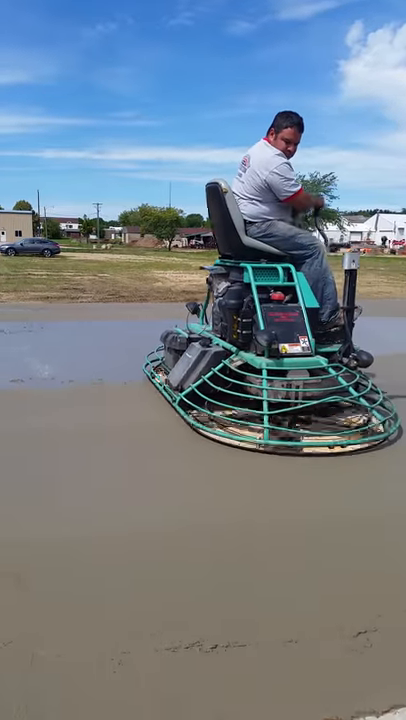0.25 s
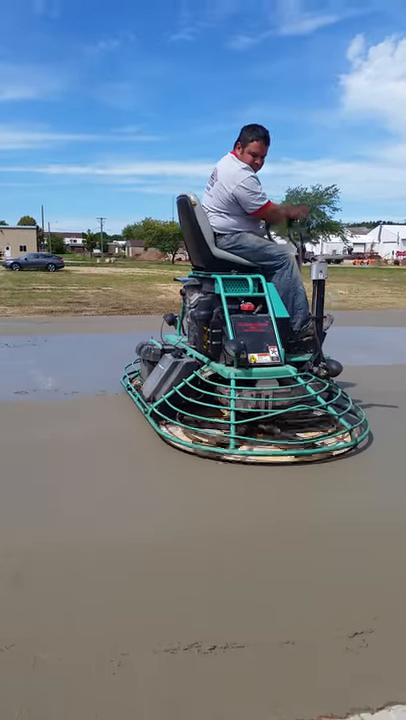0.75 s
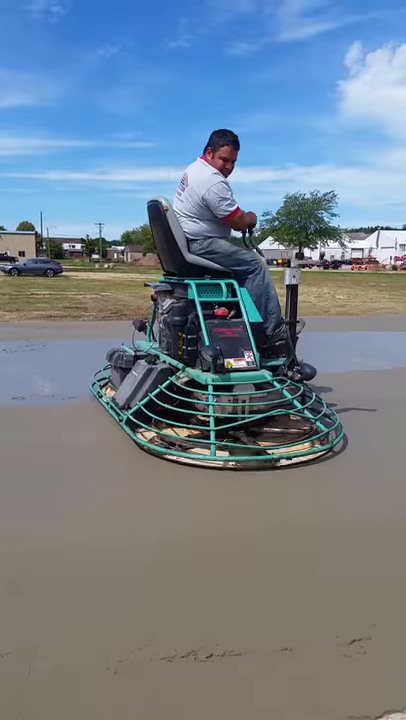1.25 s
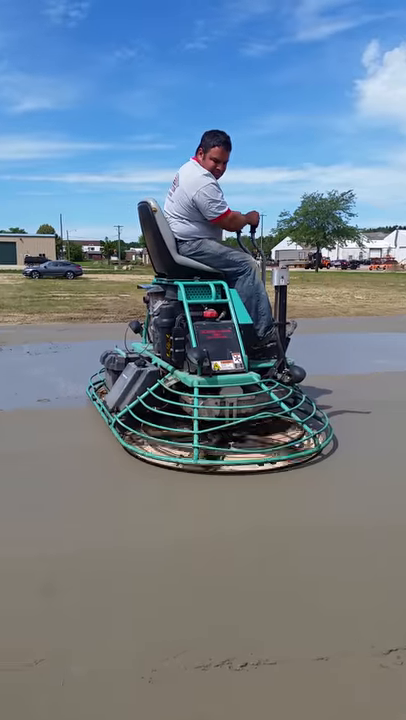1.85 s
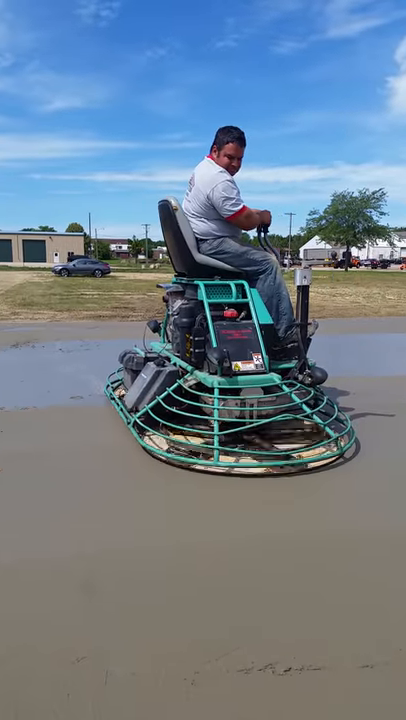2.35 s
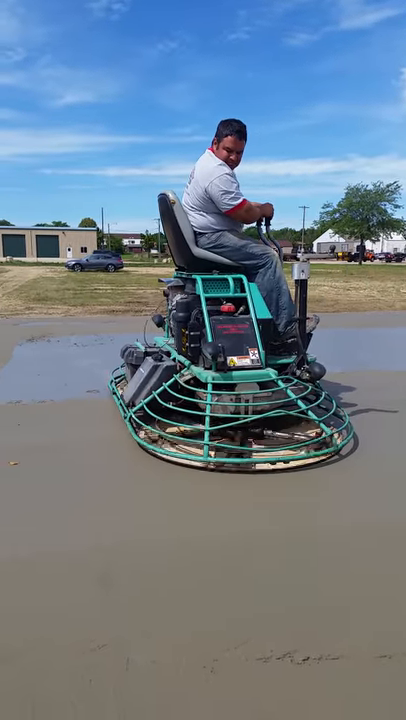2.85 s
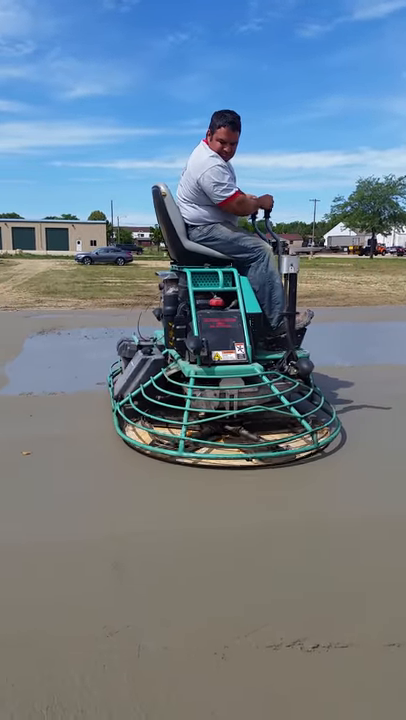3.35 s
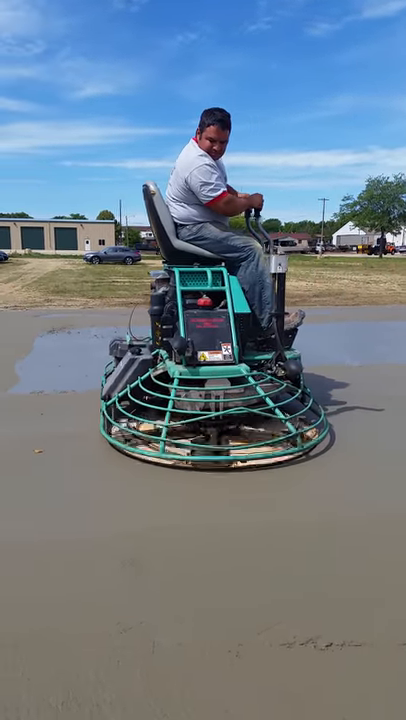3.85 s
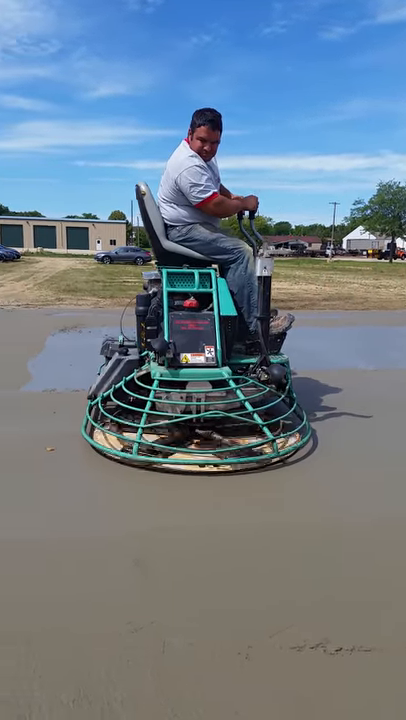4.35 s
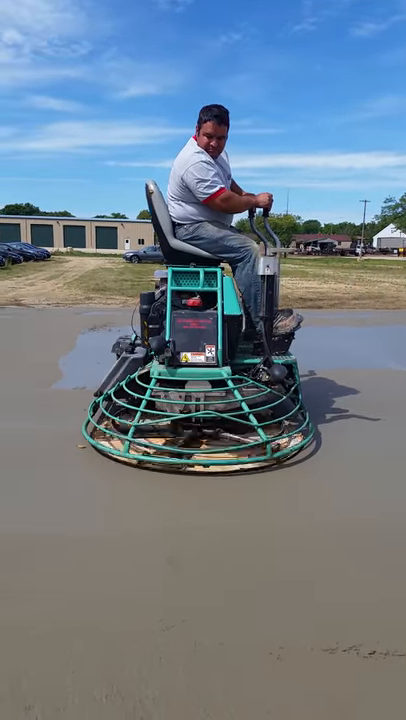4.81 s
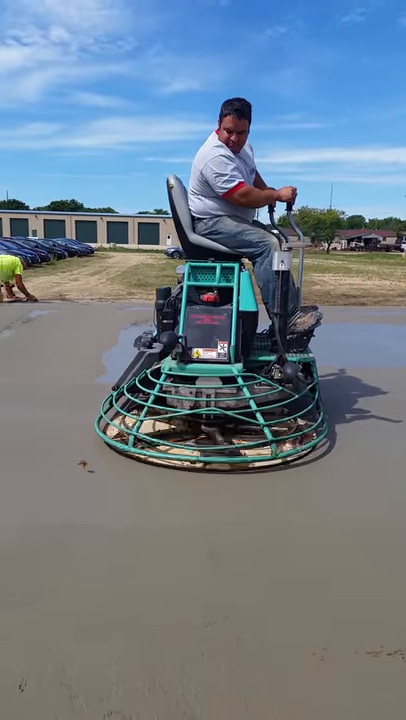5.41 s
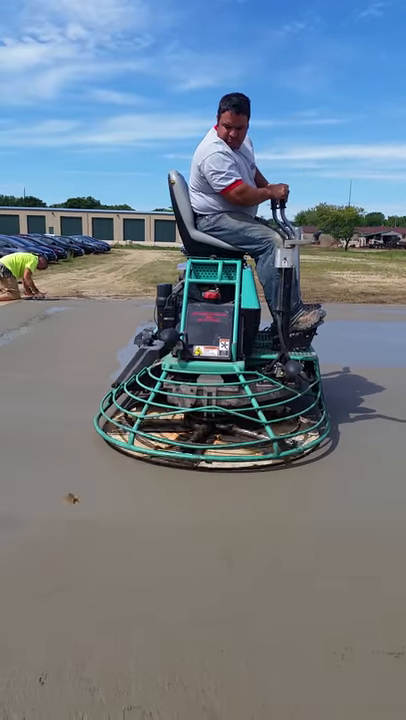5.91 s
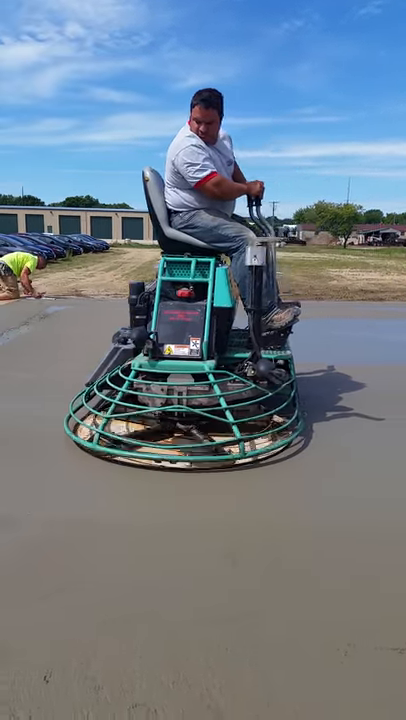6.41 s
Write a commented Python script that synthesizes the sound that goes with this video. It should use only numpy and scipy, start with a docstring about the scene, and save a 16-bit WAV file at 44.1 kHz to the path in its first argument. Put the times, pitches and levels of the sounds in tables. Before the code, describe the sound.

Out in the open, the engine of a ride-on concrete trowel drones and rattles from start to finish, heard in stereo from a few metres away. A bright, gritty hiss of steel pans rubbing wet concrete sits above it, leaning right, with a soft wind-like rumble beneath. The pitch sags only slightly under load. One small stone clicks faintly early on and two more later, as the drone and hiss swell a little.

```python
"""A ride-on power trowel smooths wet concrete in the open, a few metres away.
Its two-cylinder engine fires unevenly: the exhaust drones, the casing clatters, the fan hums faintly
and a low rush puffs with each firing over a wind-like rumble. The steel pans hiss on the gritty paste,
small stones click and faint tones ring. Left and right microphones hear different colour and delay."""
import sys
import numpy as np
from scipy import signal
from scipy.fft import rfft, irfft, next_fast_len
from scipy.io import wavfile

SR = 44100
rng = np.random.default_rng(int(sys.argv[2]) if len(sys.argv) > 2 else 0)


def persist_wave(psi):
    """Save psi, clipped to +-1, as 16-bit WAV."""
    counts = np.round(np.clip(psi, -1, 1) * 32767).astype(np.int16)
    wavfile.write(sys.argv[1], SR, np.atleast_2d(counts).T)


N = 294147

# Tone colours of the low rush with its rumble, the casing clatter and the pans' hiss:
# (frequency [Hz], relative left level [dB], relative right level [dB], likeness [0-1], right lead [rad])
RUSH_COLOUR = [(25, -67, -59, 0.27, -0.3), (60, -65, -58.5, 0, 0.0), (120, -54, -58.5, 0.66, -0.13),
               (202, -58, -56, 1, -1.3), (302, -57.5, -55.5, 0.85, 0.75), (400, -60.5, -56, 0.83, 0.2),
               (527, -64.5, -60.5, 0.42, 1.15), (683, -63, -60, 0.47, 2.5)]
CLATTER_COLOUR = [(736, -57.5, -60, 1, 0.74), (885, -57, -58, 1, 0.98), (1070, -60, -55.5, 0.99, 1.44),
                  (1220, -65, -56.5, 0.3, 0.91), (1450, -60.5, -57.5, 1, 1.2), (1680, -61, -55, 0.46, 0.8),
                  (1950, -68, -53, 0.48, 0.69), (2070, -64, -55, 0.48, -0.19),
                  (2400, -66.5, -55, 0.46, 0.87), (2510, -62, -58, 0.64, 0.78),
                  (2800, -65, -52.5, 0.18, 0.35), (3000, -64.5, -55, 0.34, 1.2),
                  (3320, -69.5, -55, 0.72, -1.5)]
HISS_COLOUR = [(3520, -64.5, -61.5, 0.58, 0), (4130, -66, -60.5, 0.99, 0.6),
               (4430, -64.5, -56.5, 0.38, 1.5), (5400, -68.5, -58, 0.36, 1), (5580, -65, -67, 0.14, -2),
               (6680, -65, -53.5, 0.37, 3), (6840, -64.5, -53, 0.79, 2.5), (7720, -55.5, -50, 0.3, 3),
               (8440, -63, -56, 0.27, 2), (9640, -62.5, -59.5, .35, 2.5), (11200, -68.5, -64.5, .15, 4),
               (11900, -63.5, -65, .05, 0), (13550, -72.5, -61, .07, -2), (14800, -68, -68.5, .05, -2)]


def exhaust(cycle, speed):
    """Two gas pulses per engine cycle make a drone of wavering harmonics (multiples of the cycle rate)."""
    # Harmonics 5 and 8 lead the drone; 1, 4 and 7 are weak: (harmonic [number], relative level [dB])
    harmonics = [(1, -34), (2, -11), (3, -15), (4, -24), (5, 0), (6, -11), (7, -21), (8, -7), (9, -13),
                 (10, -18), (11, -19), (12, -22), (13, -20), (14, -28), (15, -23), (16, -27), (17, -27),
                 (18, -29), (19, -31), (20, -28), (21, -33), (22, -35), (23, -33), (24, -32), (25, -33),
                 (26, -33)]
    # The drone as the outlet swings round: (time [s], boom of harmonics 4-7 [dB], harmonics 8-11 [dB])
    drone_levels = [(0, -22.5, -27), (.3, -22, -28), (.55, -19.1, -27), (1.1, -20.5, -27.4),
                    (1.4, -20, -25.5), (1.65, -21, -27.5), (2.1, -19.5, -24.5), (2.8, -20, -24.9),
                    (3.7, -19.5, -25), (5.0, -20.5, -25), (5.6, -19, -27), (6.2, -18, -25.5),
                    (6.67, -18, -26)]
    boom_db, upper_db = in_time(drone_levels)
    deep_db = swell(speed, -29.5, db_per_sag=1.5, db_per_s=.5)  # harmonics 1-3
    top_db = swell(speed, -36.5, db_per_sag=3, db_per_s=.7)  # 12 and up
    groups = np.zeros((4, 2, N))
    for harmonic, level_db in harmonics:
        unsteady = .0049 * harmonic  # high harmonics feel uneven burning more
        # the second pulse is weaker, and later because its pipe is longer
        second_pulse = np.angle(1 + .6 * np.exp(-2j * np.pi * harmonic * .4375))
        smear = .008 * harmonic ** 2  # the pipe spreads the pulse in time
        wander = unsteady * drift(4)
        wander += .004 * harmonic ** 2 * drift(.6)  # sound paths shift as the machine moves
        phase = 2 * np.pi * harmonic * (cycle - .06) + 2.97 + second_pulse + smear + wander
        tilt_db = -np.clip(.5 * (harmonic - 3.5), .5, 3.5)  # the left side gets less of the high tones
        lag = .014 * harmonic
        gain = from_db(level_db + 8.5 * unsteady * drift(5.4)) * from_db([[tilt_db / 2], [-tilt_db / 2]])
        groups[min(int(harmonic) // 4, 3)] += gain * np.cos(phase + [[-lag / 2], [lag / 2]])
    levels_db = deep_db, boom_db, upper_db, top_db
    return sum(from_db(db) * unit_level(group) for db, group in zip(levels_db, groups))


def low_rush(cycle, speed):
    """A low rushing noise that puffs with each firing, over a wind-like rumble."""
    puffs = rng.standard_normal((2, N)) * from_db(2 * firing_pulse(cycle, delay=.97, sharpness=12))
    rush = coloured(puffs, RUSH_COLOUR, 19, CLATTER_COLOUR[0][0], flicker_db=1, flicker_hz=11)
    return from_db(swell(speed, -32, db_per_sag=2.3, db_per_s=.28)) * rush


def casing_clatter(cycle, speed, scrub_swing_db):
    """The engine casing rattles with tiny knocks, harder at each firing and when the pans hiss louder."""
    knocks = impacts(per_s=14000, spread_db=1.2)
    knocks *= from_db(1.8 * firing_pulse(cycle, delay=.014, sharpness=15))
    clatter = coloured(knocks, CLATTER_COLOUR, RUSH_COLOUR[-1][0], HISS_COLOUR[0][0],
                       flicker_db=.47, flicker_hz=4.7)
    level_db = swell(speed, -26, db_per_sag=.83, db_per_s=-.066) + .53 * scrub_swing_db
    return from_db(level_db) * clatter


def pan_hiss(cycle, scrub_db, scrub_swing_db):
    """Steel pans rub over countless grains of grit, which blend into a hiss."""
    grit = impacts(per_s=36000, spread_db=.54)
    grit *= from_db(1.2 * firing_pulse(cycle, delay=.04, sharpness=14))
    hiss = coloured(grit, HISS_COLOUR, CLATTER_COLOUR[-1][0], SR / 2, flicker_db=.5, flicker_hz=21)
    sizzle = band_pass(hiss, [6500, 8500])  # this band swells more than the rest and flickers
    sizzle_db = .97 + .4 * scrub_swing_db + .26 * drift(1.3)
    return from_db(scrub_db) * (hiss + (from_db(sizzle_db) - 1) * sizzle)


def stone_clicks():
    """Small stones click under the pans, each a short dying ring that is stronger on the right."""
    # One click a row: (time [s], relative level [dB], pitch [Hz])
    clicks = [(1.7458, -11, 2340), (4.866, -12, 2800), (5.178, -11, 3000)]
    ring_s = .01  # time to fade by 60 dB
    out = np.zeros(N)
    t = np.arange(int(3 * ring_s * SR)) / SR
    for at, db, hz in clicks:
        start = int(at * SR)
        out[start:start + len(t)] += from_db(db - 60 * t / ring_s) * np.sin(2 * np.pi * hz * t)
    return out * from_db([[-5], [3]])


def faint_ringing():
    """Many close, faint tones ring at random and swell in brief surges."""
    # Moments when the ringing swells: (time [s], level above the steady ring [dB])
    surges = [(.44, 1), (1.5, 4), (2.02, 7), (2.97, 2), (4.33, 9), (4.87, 10), (5.18, 2), (5.5, 7.5),
              (5.76, 11), (6.17, 6), (6.39, 9.5)]
    low_hz, high_hz, count = 1456, 3467, 28
    ring_s, surge_s = .064, .059  # time to fade by 60 dB; width of a surge
    t = np.arange(N) / SR
    level_db = -36.5 + 3.5 * drift(7.8)
    level_db += sum(db * np.exp(-((t - at) / surge_s) ** 2) for at, db in surges)
    pulses = impacts(per_s=900, spread_db=1)[0]
    tones_hz = np.geomspace(low_hz, high_hz, count) * from_db(rng.normal(0, .059, count))
    chosen_tone = rng.integers(0, count, N)
    decay = from_db(-60 / (ring_s * SR))
    ring = 0
    for k, hz in enumerate(tones_hz):
        step = 2 * np.pi * hz / SR
        own_pulses = pulses * (chosen_tone == k) + 1e-18
        tone = signal.lfilter([0, np.sin(step)], [1, -2 * decay * np.cos(step), decay ** 2], own_pulses)
        ring = ring + from_db(1.3 * np.log2(hz / low_hz)) * tone  # higher tones are louder
    return from_db(level_db) * unit_level(ring) * from_db([[-15], [3]])  # mostly on the right


def cooling_fan(cycle, speed):
    """Fan blades turn with the engine and make faint, wavering tones."""
    # The blade tone and its neighbours:
    # (harmonic [number], relative left level [dB], relative right level [dB])
    blade_tones = [(30, -9, -12), (32, 2, -3), (34, -10, -12), (36, -3, -2), (37, -6, -7), (40, -4, -4)]
    tones = 0
    for harmonic, left_db, right_db in blade_tones:
        phase = 2 * np.pi * (harmonic * cycle + rng.random()) + .2 * drift(2)
        gain = from_db([[left_db], [right_db]] + 1.1 * drift(3))
        tones = tones + gain * np.cos(phase + [[0], [.7]])
    return np.sqrt(2) * from_db(swell(speed, -42.5, db_per_sag=1.7, db_per_s=.23)) * tones


def turning_dips(sound):
    """Sound partly cancels on the right; as the machine turns, one dip gives way to a higher one."""
    # Share of each band that is lost: (time [s], lower dip [0-1], upper dip [0-1])
    depths = [(0, 0.8, 0.2), (1.5, .5, 0.1), (2.1, 0.2, 0.7), (2.6, 0.44, .65), (5, 0.03, 0.5),
              (6.67, 0, .45)]
    # The two bands: (low edge [Hz], high edge [Hz])
    bands = [(3430, 3780), (3830, 4120)]
    left, right = sound
    for depth, band_hz in zip(in_time(depths), bands):
        right = right - depth * band_pass(right, band_hz)
    return np.array([left, right])


def swell(speed, base_db, db_per_sag, db_per_s):
    """Level in dB of a layer as load slows the engine and the machine draws near."""
    sag = 24.5 - speed  # cycles per second below the usual speed
    return base_db + db_per_sag * sag + db_per_s * (np.arange(N) / SR - 3.3)


def firing_pulse(cycle, delay, sharpness):
    """A bump of height 1 that comes `delay` cycles after each firing."""
    firings = 0, .625  # in cycles: gaps of 450 and 270 degrees of crank turn
    return sum(np.exp(sharpness * (np.cos(2 * np.pi * (cycle - at - delay)) - 1)) for at in firings)


def impacts(per_s, spread_db):
    """Two unrelated streams of tiny random hits."""
    sizes = from_db(spread_db * np.minimum(rng.exponential(1, (2, N)), 4)) * rng.standard_normal((2, N))
    return sizes * (rng.random((2, N)) < per_s / SR)


def coloured(noises, colour, below_hz, above_hz, flicker_db, flicker_hz, bands=6):
    """Shapes two noises into a partly alike left and right sound, in flickering bands."""
    size = next_fast_len(N)
    hz = np.maximum(np.arange(size // 2 + 1) * SR / size, 1)
    row_hz, *columns = np.transpose(colour)
    left_db, right_db, alike, lead = (np.interp(np.log(hz), np.log(row_hz), c) for c in columns)
    alike = np.clip(alike, 0, 1)
    shared, own = rfft(noises, size)
    edge_fade = np.sqrt(np.interp(hz, [below_hz, row_hz[0], row_hz[-1], above_hz], [0, 1, 1, 0]))
    left = from_db(left_db) * shared
    right = from_db(right_db) * (alike * np.exp(1j * lead) * shared + np.sqrt(1 - alike ** 2) * own)
    band_place = np.interp(np.log(hz), np.log([row_hz[0], row_hz[-1]]), [0, bands - 1])
    out, common_flicker = 0, drift(flicker_hz)
    for k in range(bands):
        band = edge_fade * np.cos(np.pi / 2 * np.clip(band_place - k, -1, 1)) ** 2
        gain = from_db(flicker_db * (.66 * common_flicker + drift(flicker_hz)))
        out = out + gain * irfft(np.array([left, right]) * band, size)[:, :N]
    return out / np.sqrt(np.mean(out.mean(axis=0) ** 2))


def drift(rate):
    """A smooth random wobble of typical size 1, changing about `rate` times a second."""
    hop = 40  # samples per random step
    memory = np.exp(-2 * np.pi * hop * rate / SR)
    noise = rng.standard_normal(N // hop + 2002)
    slow = signal.lfilter([1], [1, -2 * memory, memory ** 2], noise)[2000:]
    return np.interp(np.arange(N) / hop, np.arange(len(slow)), unit_level(slow - slow.mean()))


def band_pass(sound, band_hz):
    """Keeps one band of pitches, with gentle edges."""
    return signal.sosfilt(signal.butter(1, band_hz, "band", fs=SR, output="sos"), sound)


def in_time(rows):
    """Joins a table's points with straight lines, giving a value at every sample."""
    times, *columns = np.transpose(rows)
    return [np.interp(np.arange(N) / SR, times, c) for c in columns]


def from_db(db):
    """Turns decibels into a multiplier."""
    return np.exp(np.asarray(db) * (np.log(10) / 20))


def unit_level(x):
    """Scales a signal to an average (rms) strength of 1."""
    return x / np.sqrt(np.mean(x ** 2) + 1e-20)


def scene():
    """Mixes the engine's tones with the rush, clatter, hiss, ringing and clicks."""
    # Engine speed, with two crank turns to a cycle: (time [s], speed [cycles/s])
    engine_speed = [(0.0, 25.141), (0.68, 24.368), (1.07, 24.499), (1.39, 24.785), (1.91, 24.771),
                    (2.8, 24.289), (3.0, 24.51), (3.14, 24.422), (4.45, 24.424), (4.91, 24.585),
                    (5.55, 24.354), (5.77, 24.37), (6.19, 24.318), (6.67, 24.313)]
    # Hiss of the pans scrubbing the paste: (time [s], level [dB])
    scrub_levels = [(0, -23.1), (.35, -23), (.5, -22), (.95, -22.3), (1.1, -22.9), (1.3, -22), (1.8, -22.3),
                    (2.1, -21.5), (2.42, -21.5), (2.7, -22.8), (3.3, -21.5), (4.0, -22), (4.3, -21.5),
                    (4.9, -21.7), (5.35, -21.5), (5.62, -21), (6.1, -20.9), (6.67, -21)]
    speed = in_time(engine_speed)[0]
    cycle = -.824 + np.cumsum(speed) / SR  # running count of engine cycles
    scrub_db = in_time(scrub_levels)[0]
    scrub_swing_db = scrub_db - scrub_db.mean()
    noise = low_rush(cycle, speed) + casing_clatter(cycle, speed, scrub_swing_db)
    noise += pan_hiss(cycle, scrub_db, scrub_swing_db)
    engine_tones = exhaust(cycle, speed) + cooling_fan(cycle, speed)
    return engine_tones + turning_dips(noise + faint_ringing() + stone_clicks())


def record(dry):
    """The microphones drop the deepest bass, peaks are rounded and the highest treble is cut steeply."""
    low_hz, high_hz = 26, 14520
    thin = signal.sosfilt(signal.butter(2, low_hz, "high", fs=SR, output="sos"), dry)
    rounded = .93 * np.tanh(thin / .93)
    return signal.sosfilt(signal.ellip(16, .3, 95, high_hz, fs=SR, output="sos"), rounded)


dry = scene()
out = record(dry)
persist_wave(out)
```